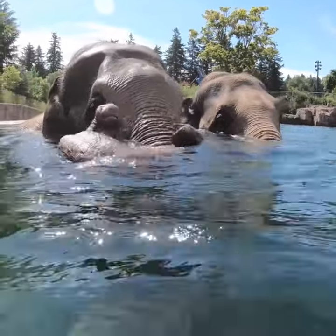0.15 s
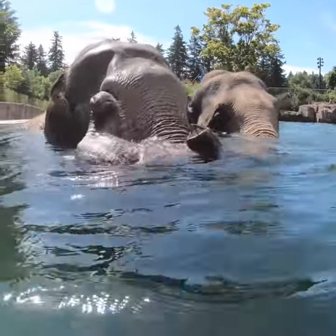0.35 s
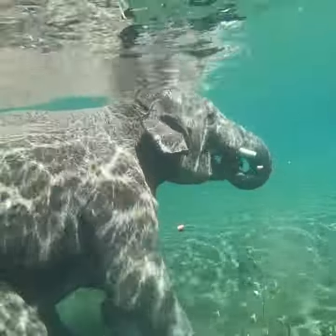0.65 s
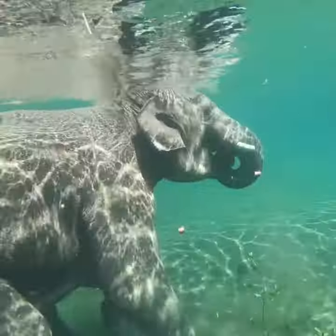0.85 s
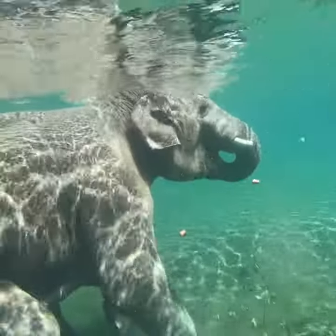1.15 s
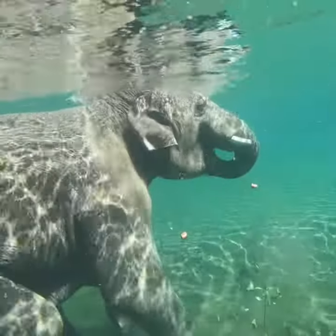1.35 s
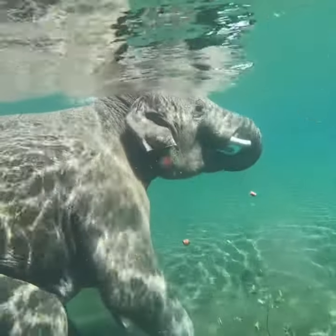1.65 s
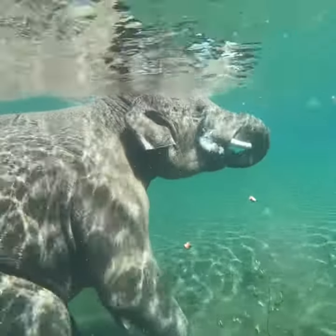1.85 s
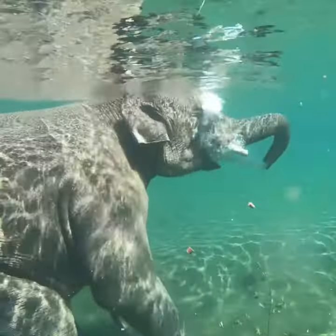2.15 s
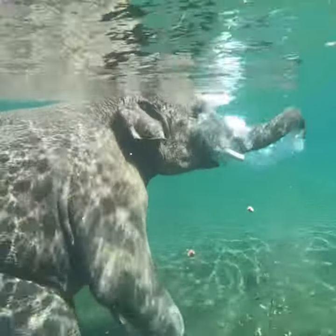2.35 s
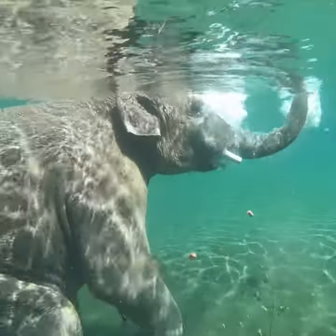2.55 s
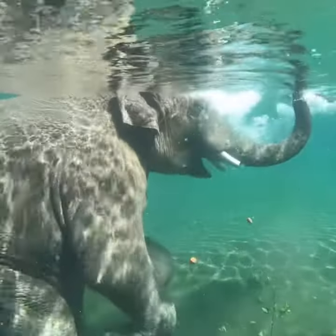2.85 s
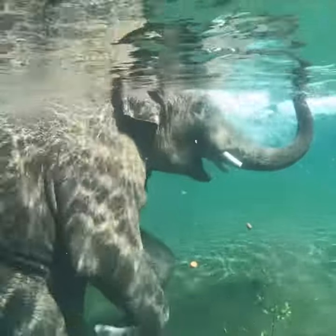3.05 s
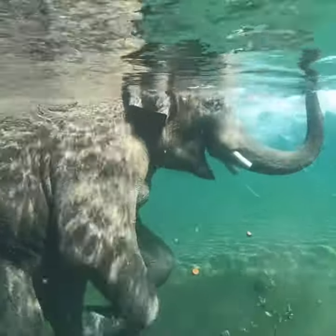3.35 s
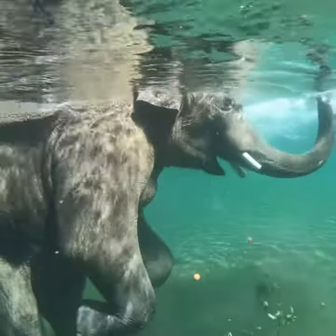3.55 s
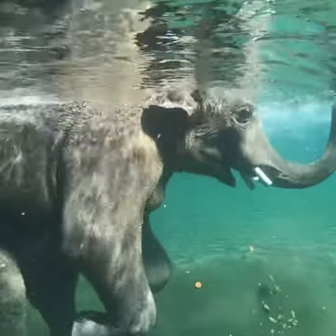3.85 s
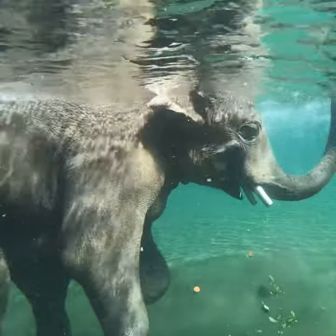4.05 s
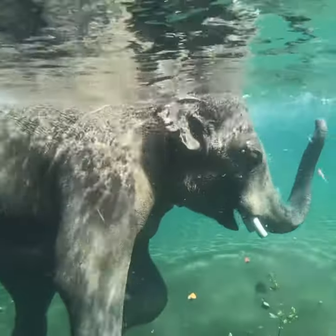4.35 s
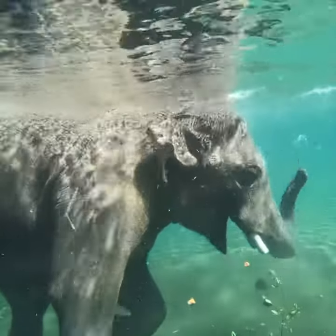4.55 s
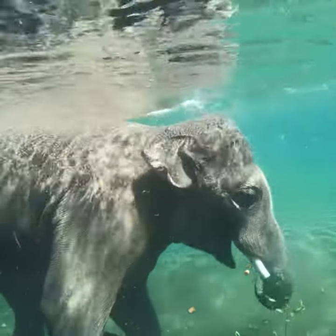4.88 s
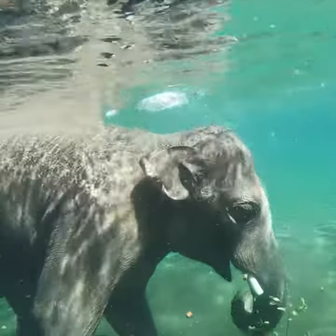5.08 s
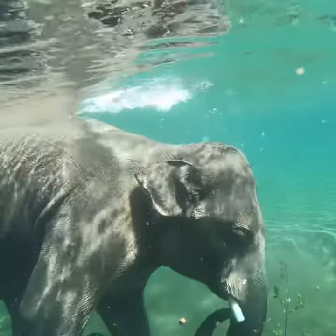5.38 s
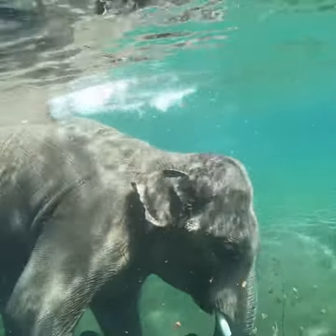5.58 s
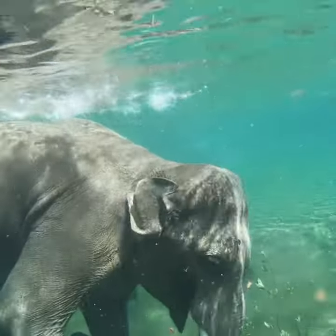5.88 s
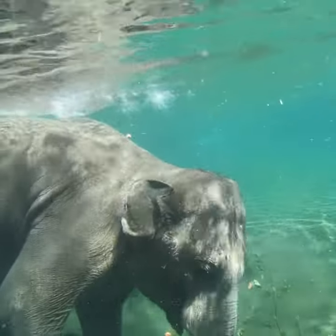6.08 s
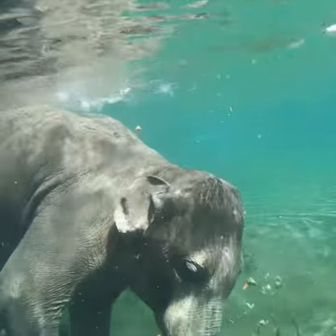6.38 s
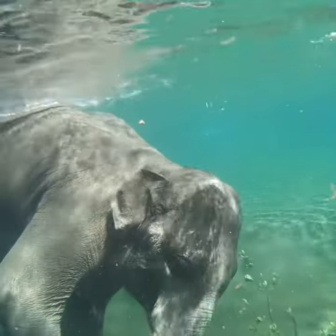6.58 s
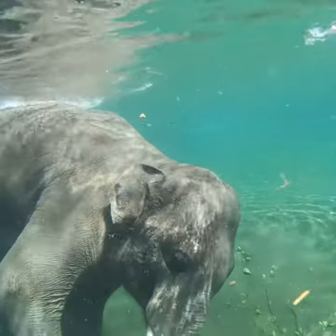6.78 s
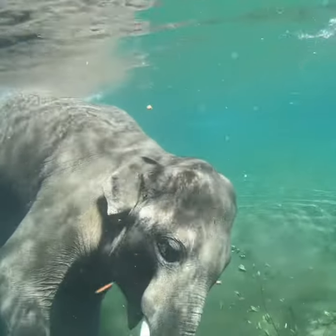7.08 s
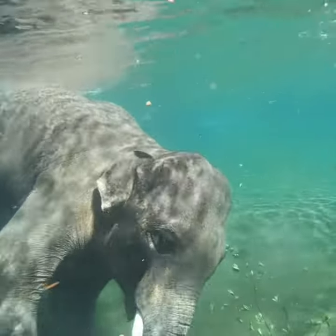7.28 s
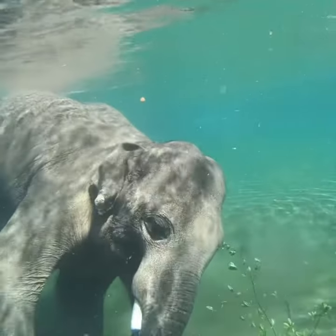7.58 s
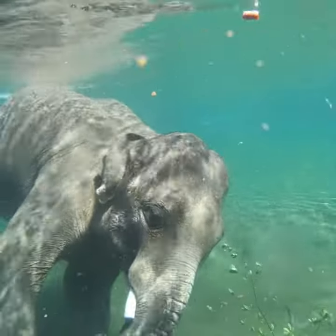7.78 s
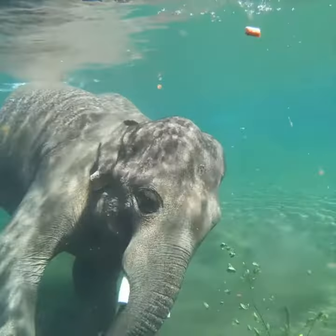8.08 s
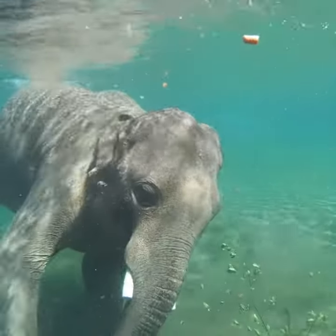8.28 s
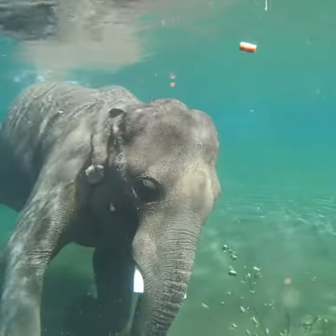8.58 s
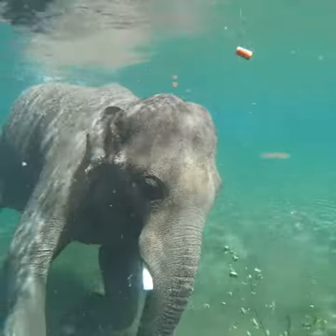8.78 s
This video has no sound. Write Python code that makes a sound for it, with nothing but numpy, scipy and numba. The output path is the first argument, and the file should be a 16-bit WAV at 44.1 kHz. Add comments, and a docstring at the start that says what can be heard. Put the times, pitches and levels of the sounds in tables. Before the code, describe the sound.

Close microphone in a small waterproof case: first a broad rush of water in air, then an abrupt plunge into dull, low underwater sound. Big bubbles glug, water heaves and pushes, and the case rings, ticks and scrapes. Air blown from a trunk fizzes early on; later surges come in clusters with calm gaps, peaking near seven seconds and ending sparse.

```python
"""Falling water above a pool, then elephants swimming below

A small sealed housing floats at the surface of an outdoor pool, where falling water rushes as shaped noise.
A hard cut with a click then goes under water beside swimming elephants: moving water heaves as low noise,
bubbles gurgle as damped resonances, and a burst of froth and a low throb follow air blown from a trunk.
Surges, knocks, streaming and rubbing ring the housing; its submerged port muffles the treble."""
import sys
import numpy as np
from scipy import signal
from scipy.fft import rfft, irfft, next_fast_len
from scipy.io import wavfile
from scipy.ndimage import uniform_filter1d
from numba import njit

SR = 44100
rng = np.random.default_rng(int(sys.argv[2]) if len(sys.argv) > 2 else 0)


def wrap_up_sound(samples):
    """Save the sound to the file named by the first command line argument, as 16-bit audio."""
    columns = np.atleast_2d(samples).T
    # keep every value between -1 and 1, then stretch to whole-number steps
    tamed = np.clip(columns, -1, 1)
    steps = np.round(tamed * 32767).astype(np.int16)
    wavfile.write(sys.argv[1], SR, steps)


N = 393813   # length [samples]
DIVE_S = .473   # time of the cut to under water [s]

# Housing resonances from low to high, struck by streaming, rubbing and ticks:
# (centre [Hz], width before the widening in resonate [Hz], gain [dB])
FIZZ_MODES = [(780, 68, 12), (920, 100, -1.5), (1068, 150, 3.5), (1250, 380, -17.5)]
WASH_MODES = [(1641, 100, 1), (1800, 89, 1.5), (2070, 220, -11)]
RUB_MODES = [(2241, 210, -0.5), (2603, 160, 1.5), (2798, 150, -2.5), (3300, 720, -20.5), (4010, 370, -17.5),
             (4574, 370, -28.5), (5400, 450, -29)]


def from_db(db):
    """Amplitude ratio: 20 dB is a factor of ten."""
    return 10 ** (np.asarray(db) / 20)


def rms_one(x):
    """Normalization to unit root-mean-square amplitude."""
    return x / np.sqrt(np.mean(x ** 2) + 1e-20)


def in_time(rows):
    """Linear interpolation of each column of a curve table, sample by sample."""
    s, *columns = np.transpose(rows)
    return [np.interp(np.arange(N) / SR, s, c) for c in columns]


def drift(rate_hz):
    """Slow random modulation of spread 1: noise through two equal real poles, computed every 40 samples."""
    r = np.exp(-80 * np.pi * rate_hz / SR)
    noise = rng.standard_normal(N // 40 + 2002)
    slow = signal.lfilter([1], [1, -2 * r, r * r], noise)[2000:]   # the start-up is dropped
    return np.interp(np.arange(N) / 40, np.arange(len(slow)), rms_one(slow))


def coloured(spectrum):
    """Stationary noise of unit rms, shaped by a spectral density and silent below its first frequency."""
    size = next_fast_len(N)
    hz, db = np.transpose(spectrum)
    f = np.arange(1, size // 2 + 2) * SR / size
    gain = from_db(np.interp(np.log(f), np.log(hz), db)) * (f > hz[0])
    return rms_one(irfft(rfft(rng.standard_normal(size)) * gain, size)[:N])


def resonate(x, modes):
    """Parallel resonances, each applied twice so that the response falls steeply between the peaks."""
    out = 0
    for k, (hz, width_hz, db) in enumerate(modes):
        r = np.exp(-np.pi * width_hz * 1.55 / SR)   # widened, since two passes narrow the peak
        b = [(1 - r * r) / 2, 0, (r * r - 1) / 2]
        a = [1, -2 * r * np.cos(2 * np.pi * hz / SR), r * r]
        once = signal.lfilter(b, a, x + 1e-18)
        out = out + (-1) ** k * from_db(db) * signal.lfilter(b, a, once)   # alternating signs
    return out


def grains(per_s, spread_db, smooth):
    """Impulsive excitation: random clicks of uneven size over a share of Gaussian noise."""
    sizes = from_db(spread_db * np.minimum(rng.exponential(1, N), 5)) * rng.choice([-1, 1], N)
    return rms_one(sizes * (rng.random(N) < per_s / SR)) + smooth * rng.standard_normal(N)


def pings(s, db, hz, t60, rise_s, glide):
    """Damped free oscillations that swell briefly, rise in pitch and last at most a quarter of a second."""
    out, t = np.zeros(N + SR), np.arange(SR // 4) / SR
    for at, level_db, f, ring in np.transpose(np.broadcast_arrays(s, db, hz, t60)):
        shape = (1 - np.exp(-t / rise_s)) * from_db(-60 * t / max(ring, .01))
        tone = np.sin(2 * np.pi * f * (t + glide * t * t / ring))
        start = int(at * SR)
        out[start:start + len(t)] += from_db(level_db) * shape / shape.max() * tone
    return out[:N]


@njit
def moving_ring(x, cos_w, r):
    """Two-pole resonance whose centre frequency follows a curve."""
    y = np.zeros(len(x))
    for i in range(2, len(x)):
        y[i] = x[i] - x[i - 2] + 2 * r * cos_w[i] * y[i - 1] - r * r * y[i - 2]
    return y


def gliding(x, hz, width_hz):
    """Moving resonance applied twice; the width is that of a single pass."""
    cos_w, r = np.cos(2 * np.pi * hz / SR), np.exp(-np.pi * width_hz / SR)
    return moving_ring(moving_ring(x, cos_w, r), cos_w, r)


def evened(x, window_s):
    """Division by the running rms: slow level changes go, the grain within the window stays."""
    power = uniform_filter1d(x ** 2, int(window_s * SR)).clip(0)
    return x / np.sqrt(power + 0.0013 * np.mean(x ** 2))


def driven(source, modes):
    """Forced resonance of the shell at a steady level."""
    return evened(resonate(source, modes), window_s=0.072)


def bursts(rows, opens_db, closes_db, edge_s):
    """Addition of powers: each row jumps in, climbs to its crest, sinks and stops; weights come later."""
    t = np.arange(N // 20 + 2) * 20 / SR   # computed every 20 samples
    shapes = []
    for s, rise, fall, *_ in rows:
        level_db = np.interp(t, [s - rise, s, s + fall], [opens_db, 0, closes_db])
        shapes.append(from_db(level_db) * (t >= s - rise) * (t < s + fall))
    edge = max(round(edge_s * SR / 20), 1)
    powers = uniform_filter1d(np.array(shapes), edge, axis=1).clip(0) ** 2
    return lambda weights: np.interp(np.arange(N) / 20, np.arange(len(t)), weights @ powers)


def hiss():
    """Electronic noise: a faint stationary random signal."""
    # noise spectrum: (frequency [Hz], relative density [dB per Hz])
    hiss_colour = [(3000, -7.5), (5500, -10), (8500, 1.5), (10500, -4), (12000, 5.5), (15500, -9.5)]
    return from_db(-95) * coloured(hiss_colour)


def rush():
    """Broadband noise of falling water in air, its roar and spray levelled apart; a click ends it."""
    # level curves: (time [s], roar level [dB], spray level [dB])
    rush_levels = [(0.0, -49.5, -68), (0.046, -41, -65), (0.062, -45.5, -65.5), (0.176, -43, -62.5),
                   (0.248, -43, -62), (0.326, -42, -58), (0.47, -41, -58)]
    # noise spectrum: (frequency [Hz], relative density [dB per Hz])
    rush_colour = [(30, -7), (100, -7.5), (160, 0), (600, -1.5), (1800, -12), (2300, -20), (3400, -26.5),
                   (4000, -26), (4700, -33), (5100, -39), (9000, -42.5), (10500, -51), (15500, -51)]
    click = np.zeros(N)
    click[round(DIVE_S * SR)] = from_db(-38)
    fall = coloured(rush_colour)
    roar_db, spray_db = in_time(rush_levels)
    roar = signal.sosfiltfilt(signal.butter(2, 2500, fs=SR, output="sos"), fall)
    both = from_db(roar_db) * rms_one(roar) + from_db(spray_db) * rms_one(fall - roar)
    return from_db(drift(17)) * both * (np.arange(N) < DIVE_S * SR) + click


def water():
    """Power summation of an uneven bed and surges, giving the levels and pitches of the low layers."""
    # bed between surges, before random lumps and layer trims: (time [s], swell level [dB],
    # push level [dB], gurgle level [dB], cavity level [dB], cavity pitch before squeeze and wander [Hz])
    bed_curve = [(.47, -56, -62, -59, -59, 505), (.52, -56, -71, -61, -57, 497),
                 (.75, -53.5, -69, -53.5, -60, 520), (1.05, -51, -59, -45, -45.5, 538),
                 (1.45, -53, -56, -48, -51, 486), (1.62, -47, -50.5, -39, -43, 544),
                 (1.85, -33, -33.5, -34.5, -47.5, 506), (2.15, -36, -41.5, -36, -39, 471),
                 (2.45, -43, -38.5, -45.5, -37.5, 460), (2.62, -37.5, -37.5, -34, -44.5, 492),
                 (3.1, -44, -54.5, -47.5, -52, 461), (3.55, -49, -45.5, -42.5, -37, 446),
                 (3.88, -54, -54, -59, -66, 484), (4.05, -49, -43, -45.5, -48, 456),
                 (4.3, -37.5, -35.5, -41.5, -47, 488), (4.6, -55.5, -51.5, -50, -52, 466),
                 (5.1, -58, -53, -49.5, -53.5, 460), (5.5, -48.5, -54, -40, -44, 486),
                 (5.8, -53.5, -48, -49.5, -57, 472), (6.25, -39, -57, -44, -46.5, 464),
                 (6.6, -34, -40, -44, -55.5, 502), (7.0, -35.5, -48, -26.5, -37, 493),
                 (7.35, -42, -50, -50.5, -63.5, 521), (7.75, -49, -58.5, -54.5, -54, 465),
                 (7.97, -59, -75, -63.5, -55, 505), (8.22, -57, -67, -54, -62, 475),
                 (8.5, -60.5, -65, -54, -60.5, 452), (8.93, -43, -68, -58.5, -52, 455)]
    # surges against the housing, levels before layer trims: (crest time [s], rise [s], fall [s],
    # push level [dB], gurgle level [dB], cavity level [dB], gurgle pitch before wander [Hz])
    surge_rows = [(.59, 0.048, .04, -44.5, -37.5, -40, 190), (1.53, .03, 0.03, -52, -31.5, -47, 187),
                  (1.67, .03, 0.071, -41, -25, -43, 195.7), (1.77, 0.064, 0.058, -27.5, -25.5, -38.5, 163),
                  (1.999, 0.018, 0.035, -38.5, -39.5, -31.5, 244),
                  (2.12, 0.018, 0.064, -33.5, -31, -48, 203), (2.25, .08, 0.053, -42, -32.5, -35.5, 179.4),
                  (2.38, 0.15, 0.017, -36, -29, -52, 167.7), (2.489, 0.022, 0.024, -26, -37, -33, 144),
                  (2.569, .05, 0.042, -38, -25.5, -26, 186), (2.78, .07, 0.041, -39, -34.5, -59.5, 156.4),
                  (2.92, .03, 0.033, -54, -40, -40, 194.7), (3.04, 0.077, 0.035, -49, -35.5, -52, 194),
                  (3.18, .03, 0.033, -61, -40, -45, 177), (3.34, .05, .05, -50, -28.5, -50, 186.7),
                  (3.41, 0.062, .05, -43, -27.5, -35.5, 256), (3.529, .05, .09, -31.5, -21, -38, 230),
                  (3.96, .02, 0.06, -42, -46, -60, 256), (4.1, 0.027, .025, -41.5, -47, -33.5, 170),
                  (4.18, .04, .04, -33, -18.5, -30, 242.6), (4.239, 0.078, 0.063, -25.5, -18, -24.5, 230),
                  (4.36, .03, .05, -37, -30, -33.5, 217.4), (4.45, .06, 0.045, -26.5, -18.5, -34, 259.4),
                  (4.71, 0.037, .04, -57, -34.5, -41, 237), (4.9, 0.034, 0.085, -41, -44.5, -53.5, 141),
                  (5.11, 0.022, 0.046, -47, -38, -38.5, 208), (5.27, 0.024, 0.05, -48, -35.5, -45, 174),
                  (5.37, 0.037, .05, -57, -40.5, -38, 185.3), (5.599, 0.034, 0.024, -43, -24, -31, 202),
                  (5.65, 0.026, 0.067, -37, -19.5, -29.5, 253.6),
                  (5.72, 0.049, 0.036, -30.5, -23.5, -39.5, 222), (6.0, 0.098, 0.11, -39.5, -32, -36, 209),
                  (6.15, 0.018, 0.044, -59, -41, -51, 260), (6.37, 0.028, 0.15, -46, -25, -35.5, 204),
                  (6.54, .08, 0.044, -28.5, -25, -38.5, 239), (6.772, 0.041, 0.086, -24, -17, -22.5, 213),
                  (6.87, 0.085, 0.046, -50.5, -14, -26.5, 200.7), (6.94, .04, .06, -44, -14, -21.5, 200),
                  (7.04, 0.046, 0.053, -33, -16.5, -17, 175), (7.1, 0.054, 0.094, -40, -17.5, -32.5, 204),
                  (7.19, 0.038, 0.088, -33.5, -31, -30.5, 193), (7.275, 0.036, .05, -40.5, -27, -47.5, 183),
                  (7.4, 0.027, 0.062, -45, -50.5, -45.5, 158.5),
                  (7.621, .055, 0.075, -40, -24, -41.5, 196.7),
                  (7.699, 0.067, 0.079, -32.5, -21, -34, 203.6), (7.85, 0.062, .08, -50, -45, -51, 183),
                  (8.281, 0.028, 0.18, -45.5, -36.5, -40.5, 189),
                  (8.385, 0.07, 0.099, -31.5, -31, -42.5, 172)]
    rest_gurgle_hz = 170       # gurgle pitch between surges, before wander
    squeeze_hz_per_db = 1.53   # a surge lifts the cavity pitch

    swell_db, *beds, cavity_hz = in_time(bed_curve)
    *surge_db, surge_hz = np.transpose(surge_rows)[3:]
    power = bursts(surge_rows, opens_db=-9, closes_db=-16, edge_s=0.038)
    calm = [from_db(2 * (db + 2.5 * drift(6.0))) for db in beds]   # powers, with lumps in dB
    total = [bed + power(from_db(2 * db)) for bed, db in zip(calm, surge_db)]
    push_db, gurgle_db, cavity_db = 10 * np.log10(total)
    # the gurgle pitch is an average weighted by power
    surge_pitch = power(from_db(2 * surge_db[1]) * surge_hz)
    gurgle_hz = (calm[1] * rest_gurgle_hz + surge_pitch) / total[1]
    cavity_hz = cavity_hz + squeeze_hz_per_db * 10 * np.log10(total[2] / calm[2])
    return (swell_db + 4 * drift(1.7), push_db, gurgle_db, gurgle_hz * (1 + .08 * drift(8.0)),
            cavity_db, cavity_hz * (1 + .03 * drift(13.0)))


def heave(swell_db, push_db):
    """Pressure fluctuation of moving water: low band noise as a slow swell and quicker pushes."""
    swell_band = signal.butter(2, [16, 45], "band", fs=SR, output="sos")
    push_band = signal.butter(2, [45, 100], "band", fs=SR, output="sos")
    swell = evened(signal.sosfilt(swell_band, rng.standard_normal(N)), window_s=0.08)
    push = evened(signal.sosfilt(push_band, rng.standard_normal(N)), window_s=0.026)
    return from_db(swell_db) * swell + from_db(push_db) * push


def gurgle(db, centre_hz):
    """Volume resonance of big bubbles: random births ring, many near one moving pitch, plus single ones."""
    # large single bubbles: (time [s], peak level before a 6 dB cut [dB], initial pitch [Hz], 60 dB decay [s])
    glugs = [(0.576, -44, 173, 0.072), (1.519, -26.5, 185, 0.091), (1.569, -30.5, 153, 0.1),
             (1.655, -25, 159, 0.088), (1.734, -17.5, 136, 0.047), (1.891, -22.5, 148, 0.1),
             (1.938, -35, 116, 0.1), (1.995, -18, 290, 0.13), (2.084, -29, 92.5, 0.18),
             (2.116, -19.5, 207, 0.047), (2.163, -18, 154, 0.053), (2.216, -22, 180, 0.15),
             (2.407, -26, 179, 0.15), (2.48, -18.5, 119, 0.16), (2.542, -15.5, 96.9, 0.091),
             (2.567, -14, 194, 0.13), (2.639, -17.5, 112.7, 0.12), (2.724, -18, 118.5, 0.14),
             (2.775, -19, 114.4, 0.23), (3.017, -39, 370, 0.072), (3.018, -25.5, 197, 0.056),
             (3.154, -36.5, 152, 0.048), (3.266, -21, 210, 0.044), (3.325, -23.5, 178, 0.098),
             (3.522, -15, 94.5, 0.13), (3.525, -8.5, 247.8, 0.12), (3.954, -28, 283.4, 0.12),
             (4.074, -35, 151, 0.092), (4.18, -33.5, 225, 0.075), (4.183, -16, 346, 0.24),
             (4.414, -19, 252, 0.24), (4.64, -38, 243, 0.16), (4.815, -32.5, 247, 0.043),
             (4.957, -29.5, 94, 0.13), (5.031, -32.5, 224, 0.084), (5.12, -51, 91.5, 0.1),
             (5.125, -25, 194, 0.058), (5.249, -25, 177, 0.11), (5.597, -14.5, 181, 0.055),
             (5.641, -12.5, 256.4, 0.11), (5.906, -33, 172, 0.085), (5.954, -32, 244, 0.12),
             (6.285, -32, 112, 0.089), (6.355, -15.5, 143, 0.04), (6.458, -15, 245, 0.14),
             (6.52, -16.5, 250, 0.097), (6.731, -14.5, 306.6, 0.21), (6.974, -10, 222.6, 0.1),
             (7.141, -10, 227.7, 0.2), (7.262, -15, 140.5, 0.084), (7.382, -31, 150, 0.083),
             (7.491, -29.5, 166, 0.13), (7.571, -16, 157.6, 0.072), (7.624, -14, 230.7, 0.17),
             (7.681, -15.5, 182.3, 0.4), (8.26, -29.5, 178.4, 0.14), (8.37, -30, 283, 0.066),
             (8.376, -11.5, 171, 0.11)]
    born, dealt, spread = grains(260, 2.33, 0.018), rng.integers(0, 14, N), 0
    for k, hz in enumerate(np.geomspace(95, 400, 14)):   # each birth falls in one of 14 sizes
        tilt_db = -5.0 * np.log2(hz / 190) ** 2
        spread = spread + resonate(born * (dealt == k), [(hz, hz / 7.2, tilt_db)])
    crowd = evened(gliding(grains(140, 4.5, 0.093), centre_hz, width_hz=83.4), window_s=0.035)
    both = evened(evened(spread, window_s=0.05) + crowd, window_s=0.069)
    s, peak_db, hz, t60 = np.transpose(glugs)
    single = pings(s, peak_db - 6, hz, t60, rise_s=0.0067, glide=0.027)
    return from_db(db - 3.0 + drift(33)) * both + single


def cavity(db, hz):
    """Cavity resonance: the air space of the housing rings at a pitch that shifts with the squeeze on it."""
    # knocks that ring the cavity: (time [s], peak level before a 3.5 dB cut [dB], initial pitch [Hz])
    knocks = [(0.56, -37, 560), (0.771, -32.5, 478), (0.996, -40, 506), (1.137, -32.5, 573),
              (1.516, -21, 636), (1.65, -18.5, 586), (1.676, -24, 580), (1.724, -22.5, 520),
              (1.743, -23, 567), (1.868, -30.5, 457), (2.101, -30.5, 570), (2.123, -33, 410),
              (2.162, -26.5, 447), (2.236, -34, 487), (2.375, -40, 523), (2.511, -21.5, 475),
              (2.555, -21.5, 523), (2.569, -18.5, 385), (2.669, -32.5, 403), (2.99, -32.5, 440),
              (3.016, -33, 440), (3.357, -28.5, 468), (3.486, -34.5, 470), (3.516, -26, 395),
              (4.144, -25.5, 504), (4.171, -25, 405), (4.204, -27.5, 395), (4.234, -23.5, 555),
              (4.341, -31, 517), (4.431, -21.5, 530), (4.564, -34.5, 427), (5.078, -35.5, 458),
              (5.266, -32.5, 481), (5.578, -29.5, 510), (5.601, -16, 427), (5.65, -28.5, 406),
              (5.701, -24, 397), (5.955, -39, 465), (5.989, -28, 448), (6.043, -27.5, 480),
              (6.078, -28.5, 465), (6.154, -29.5, 463), (6.222, -34.5, 476), (6.384, -40, 506),
              (6.399, -18.5, 514), (6.459, -22, 462), (6.515, -32, 424), (6.534, -21.5, 469),
              (6.725, -33, 460), (6.748, -32, 473), (6.781, -14, 456), (6.793, -9.5, 494),
              (6.831, -15, 556), (6.858, -10.5, 538), (6.895, -13, 533), (6.926, -23, 554),
              (6.968, -10.5, 514), (6.994, -13.5, 560), (7.026, -27, 550), (7.126, -14.5, 544),
              (7.187, -35, 508), (7.261, -20.5, 533), (7.572, -26.5, 550), (7.594, -21.5, 517),
              (7.619, -26.5, 573), (7.678, -14, 458), (7.766, -42, 506), (8.264, -30.5, 448),
              (8.358, -27, 462), (8.378, -21, 420)]
    ring = evened(gliding(grains(500, 3.0, 0.41), hz, width_hz=108.0), window_s=.06)
    s, peak_db, knock_hz = np.transpose(knocks)
    knocked = pings(s, peak_db - 3.5, knock_hz, t60=0.042, rise_s=0.004, glide=0.042)
    return from_db(db - 2.0 + 2.8 * drift(20)) * ring + knocked


def stream(fizz_db, wash_db, sparkle_db, glint_db):
    """Flow excitation: one irregular source of streaming water drives four groups of shell resonances."""
    # higher groups: (centre [Hz], width before the widening in resonate [Hz], gain [dB])
    sparkle_modes = [(2700, 190, 3.5), (3100, 200, -5), (2300, 100, -7)]
    glint_modes = [(3740, 190, 2.5), (3360, 180, -2.5), (4220, 230, -5)]
    flow, swirl_db, out = grains(300, 2.5, 1.3), 1.5 * drift(14), 0
    for db, modes in ((fizz_db, FIZZ_MODES), (wash_db, WASH_MODES),
                      (sparkle_db, sparkle_modes), (glint_db, glint_modes)):
        out = out + from_db(db + swirl_db + 2 * drift(20)) * driven(flow, modes)
    return out


def bubbles(fizz_db):
    """Bubble resonance: pitched ones, random small ones that follow the fizz, and a cloud of fine ones."""
    # cloud passing close: (time [s], level [dB], centre [Hz])
    cloud_curve = [(4.84, -100, 3200), (4.87, -69, 3300), (4.92, -70.5, 3300), (4.95, -85, 2980),
                   (5.0, -69.5, 2870), (5.07, -65, 2900), (5.1, -75, 3750), (5.12, -100, 3800)]
    # single small bubbles: (time [s], peak level [dB], initial pitch [Hz], 60 dB decay [s])
    blips = [(0.659, -63, 1180, 0.074), (1.517, -45, 1250, 0.022), (1.547, -37, 1430, 0.016),
             (1.572, -63, 3300, 0.014), (1.595, -61, 3100, 0.017), (1.61, -69, 3070, .02),
             (1.63, -26.5, 840, 0.015), (1.644, -25, 940, 0.025), (2.899, -45.5, 1635, 0.024),
             (5.405, -55, 1380, 0.029), (6.69, -49.5, 1640, 0.026), (7.43, -80, 2120, .02),
             (7.462, -79, 2700, 0.37), (8.019, -64, 1630, 0.073), (8.033, -66, 1190, 0.05),
             (8.036, -62, 940, 0.075), (8.08, -72, 1010, 0.05), (8.114, -65, 1800, 0.034),
             (8.12, -73, 2700, .03), (8.61, -62, 940, 0.079)]
    db, hz = in_time(cloud_curve)
    cloud = evened(gliding(grains(800, 3.0, 1.5), hz, width_hz=800), window_s=.05)
    when, size, strength = rng.random((160, 3)).T
    s = DIVE_S + when * (N / SR - DIVE_S)
    small_hz = 650 * 1.9 ** size
    small_db = fizz_db[(s * SR).astype(int)] + 1.5 + 5.1 * strength
    small = pings(s, small_db, small_hz, 35.0 / small_hz, rise_s=.003, glide=.06)
    single = pings(*np.transpose(blips), rise_s=0.0026, glide=0.018)
    return from_db(db) * cloud * (db > -94) + small + single


def strokes():
    """Intermittent contact: gains of bright, middle and dull rubbing, with edges of a few milliseconds."""
    # rubbing strokes on the housing: (hardest time [s], rise [s], fall [s],
    # bright level [dB], middle level [dB], dull level [dB])
    stroke_rows = [(0.582, 0.029, .03, -66, -58, -48.5), (1.66, .02, .04, -55, -50, -47),
                   (1.74, 0.035, .08, -55.5, -48, -49), (1.89, .03, .06, -63.5, -62, -61),
                   (2.52, 0.016, .03, -58, -54, -51), (2.57, 0.031, .028, -47.5, -43, -37.5),
                   (2.67, .011, .024, -57.5, -62, -52.5), (2.738, 0.014, .012, -67, -75.5, -59),
                   (2.773, 0.01, .017, -64, -70.5, -53), (2.905, 0.021, .02, -61.5, -63, -59),
                   (2.99, 0.011, .04, -62, -70, -51.5), (3.177, 0.023, .017, -62, -57, -52.5),
                   (3.268, 0.016, .032, -65.5, -65, -60), (3.33, 0.0089, .04, -58, -61, -49),
                   (3.406, 0.067, .054, -61, -48.5, -39), (3.515, 0.038, .049, -49.5, -47.5, -39.5),
                   (4.08, .01, .015, -67, -72, -66.5), (4.15, 0.024, .05, -48.5, -50, -43.5),
                   (4.195, 0.041, .04, -47.5, -49, -43), (4.249, 0.11, .045, -47, -47, -41.5),
                   (4.352, 0.043, .06, -57, -56.5, -53.5), (4.444, 0.047, .035, -46, -42.5, -41.5),
                   (4.566, 0.0052, .02, -65, -63, -59), (4.644, 0.022, .021, -65, -57, -55),
                   (4.717, .03, .017, -77, -56, -52), (5.601, 0.027, .022, -50.5, -52, -41.5),
                   (5.66, 0.033, .03, -50, -52, -41.5), (5.699, 0.028, .038, -51, -50, -41),
                   (6.031, 0.077, .03, -60.5, -58, -48), (6.159, 0.016, .021, -76, -57, -57),
                   (6.361, .012, .07, -55, -56.5, -48), (6.468, 0.021, .032, -55.5, -67, -46),
                   (6.532, 0.025, .026, -44, -48, -39.5), (6.623, .012, .014, -61, -65, -56),
                   (6.744, 0.031, .034, -44.5, -50.5, -40), (6.793, 0.017, .022, -48, -48.5, -33),
                   (6.84, .012, .016, -55, -56.5, -42), (6.869, .012, .05, -54, -53, -46),
                   (6.935, 0.1, .022, -52.5, -49.5, -47), (6.982, 0.021, .035, -48.5, -49, -40),
                   (7.035, 0.019, .03, -50, -50, -43), (7.085, 0.037, .03, -53, -52, -58),
                   (7.14, 0.02, .02, -53.5, -47.5, -50), (7.211, 0.049, .034, -55.5, -58.5, -47),
                   (7.265, 0.025, .015, -59.5, -55.5, -49.5), (7.601, 0.039, .05, -57.5, -56, -49),
                   (7.648, 0.038, .03, -54.5, -53, -52.5), (7.685, 0.028, .02, -50.5, -48, -42.5),
                   (7.73, 0.044, .012, -67, -65, -72), (7.817, 0.017, .015, -68, -65.5, -63),
                   (7.893, 0.018, .012, -73, -68, -64.5), (8.27, 0.021, .04, -68, -59, -64),
                   (8.33, 0.035, .035, -64, -62, -63), (8.379, 0.04, .014, -64, -53, -57.5),
                   (8.447, .007, .013, -75, -72, -72)]
    power = bursts(stroke_rows, opens_db=-11.5, closes_db=-16, edge_s=.004)
    return np.sqrt([power(from_db(2 * db)) for db in np.transpose(stroke_rows)[3:]])


def rub():
    """Stick-slip friction: the same slips of one contact shake three groups of resonances at once."""
    bright, middle, dull = strokes() * from_db(2.0 * drift(53))   # slips come in clumps
    slips = grains(1200, 3.8, .8)
    low = dull * driven(slips, FIZZ_MODES) + middle * driven(slips, WASH_MODES)
    return low + bright * driven(slips, RUB_MODES)


def blow():
    """Bubble froth of air blown from a trunk: moving resonances whose upper edge sinks."""
    # burst curve: (time [s], level [dB], upper edge [Hz])
    blow_curve = [(1.497, -84, 1580), (1.51, -40, 1575), (1.53, -33.5, 1500), (1.56, -44.5, 1306),
                  (1.62, -44.5, 1276), (1.645, -44.5, 1250), (1.66, -61, 1100), (1.67, -95, 1000)]
    db, edge_hz = in_time(blow_curve)
    froth = grains(1500, 8.0, 0.68)
    crowd = 0
    for share in (.5, .7, .88):
        crowd = crowd + evened(gliding(froth, share * edge_hz, width_hz=130), window_s=0.035)
    return from_db(db) * (db > -74) * evened(crowd, window_s=0.026)


def ticks():
    """Impulse response of the shell: each tick strikes all three groups and drags a short noisy scuff."""
    # ticks: (time [s], strike level before the group offsets [dB], extra strike level of the rub group [dB])
    tick_rows = [(1.513, -45, -5), (1.524, -40, -9), (1.645, -33, 0), (1.6866, -27.5, -3),
                 (1.7214, -27.5, -4), (2.515, -43, 1), (2.5336, -26, 3), (2.5608, -22, -8.5),
                 (2.6696, -31.5, 1), (2.7717, -47.5, 7.5), (2.8983, -40, 2.5), (2.9903, -36.5, 0),
                 (3.3262, -35, 6), (3.3504, -47, -8), (3.383, -38, -7.5), (3.482, -36, 11), (3.507, -23, 1),
                 (4.1331, -51, -4), (4.145, -34.5, 6), (4.2426, -21.5, 1), (4.3396, -53, 0),
                 (4.402, -37, -1), (4.4234, -29, 7), (4.5636, -37.5, 8.5), (5.5768, -39, 11),
                 (5.5913, -29, 4), (5.6543, -42, 10), (5.698, -27, 10), (5.8283, -41.5, -17),
                 (5.8845, -41, -2), (5.984, -38, 5), (5.9974, -26, -4.5), (6.0283, -37, 8),
                 (6.148, -41, -2), (6.2201, -33.5, -13), (6.357, -41, 0.5), (6.463, -38, 4),
                 (6.5142, -37, 0), (6.53, -25, 0), (6.6918, -44, -8), (6.7217, -43, 3), (6.733, -30, 0),
                 (6.7879, -26, 7), (6.834, -34, 7), (6.86, -47, 19), (6.9252, -43, -4), (6.9661, -46.5, 2),
                 (6.9774, -35, 2), (7.0263, -30, 7), (7.0474, -32, 6), (7.0753, -39.5, 4.5),
                 (7.1285, -43.5, 4), (7.2131, -36, 8), (7.5738, -56, -8.5), (7.8013, -53, 2),
                 (8.2632, -35, 6), (8.3749, -34, 3), (8.7561, -43, 3), (8.788, -46.5, 1)]
    s, peak_db, bright_db = np.transpose(tick_rows)
    out = 0
    for modes, db in ((FIZZ_MODES, peak_db + 11.5), (WASH_MODES, peak_db + 21.5),
                      (RUB_MODES, peak_db + bright_db + 9.5)):
        clicks = np.zeros(N)
        clicks[(s * SR).astype(int)] = from_db(db)
        decay = signal.lfilter([1], [1, -np.exp(-1 / (0.0029 * SR))], clicks)   # 2.9 ms time constant
        scuff = decay * rng.standard_normal(N)
        out = out + resonate(clicks + 0.042 * scuff, modes)
    return out


def throb():
    """Falling low tone: a throb of uneven loudness sinks in pitch while the blown air rises in big pockets."""
    # tone curve: (time [s], pitch [Hz], rms level [dB])
    throb_curve = [(1.72, 50.6, -40), (1.744, 50, -37), (1.86, 50.7, -32), (1.874, 50, -55),
                   (1.924, 47.8, -26), (2.012, 47.9, -32.5), (2.054, 44.1, -29), (2.106, 40.2, -40),
                   (2.18, 38, -26.5), (2.24, 37, -45)]
    hz, db = in_time(throb_curve)
    start_s, end_s = throb_curve[0][0], throb_curve[-1][0]
    fade = np.interp(np.arange(N) / SR, [start_s - .02, start_s, end_s, end_s + .03], [0, 1, 1, 0])
    return np.sqrt(2) * from_db(db) * fade * np.sin(2 * np.pi * np.cumsum(hz) / SR)


def port(x):
    """Transmission loss of the submerged port: a dip above the cavity ring and muffled treble."""
    dip_hz, dip_width_hz, dip_share, cut_hz = 721, 124, 0.34, 6300   # width before the widening in resonate
    x = x - dip_share * resonate(x, [(dip_hz, dip_width_hz, 0)])
    return signal.sosfilt(signal.butter(4, cut_hz, fs=SR, output="sos"), x)


def scene():
    """Superposition: air before the cut, water after it, faint electronic hiss throughout."""
    # water streaming past the housing: (time [s], fizz level [dB], wash level [dB],
    # sparkle level [dB], glint level [dB]), before random swirl
    stream_curve = [(.47, -77, -73, -91, -83), (.6, -74, -82, -93, -89), (.8, -74, -74, -86.5, -95),
                    (1.1, -70.5, -79.5, -87.5, -94), (1.18, -70.5, -81, -88, -99),
                    (1.49, -63.5, -82, -93, -100), (1.58, -46, -73, -78, -94), (1.67, -52, -61, -66, -90.5),
                    (1.75, -71, -70, -71, -81), (1.92, -63, -61.5, -74.5, -81.5),
                    (2.3, -57, -66, -80.5, -90), (2.65, -65.5, -72, -75.5, -85), (3.05, -73, -80, -78, -90),
                    (3.4, -61.5, -69, -67.5, -72.5), (3.56, -56.5, -62, -74, -78),
                    (3.78, -71, -64.5, -71.5, -77), (3.85, -79, -78, -89, -89), (4.1, -61.5, -78, -83, -96),
                    (4.27, -59, -64.5, -71.5, -83), (4.55, -69, -79.5, -73, -82.5),
                    (4.88, -66.5, -66, -74, -86), (5.13, -67, -71, -81.5, -81),
                    (5.55, -55.5, -62.5, -83.5, -90.5), (5.75, -77, -72.5, -78, -88.5),
                    (5.95, -59.5, -68, -74.5, -78.5), (6.36, -62, -63.5, -73.5, -84.5),
                    (6.6, -70.5, -76, -77, -86), (6.92, -52.5, -58.5, -68.5, -78.5),
                    (7.1, -53, -66, -84, -83), (7.28, -83.5, -83.5, -98.5, -105),
                    (7.65, -76, -69, -81.5, -100), (7.8, -85, -86.5, -98.5, -100),
                    (8.08, -79, -81.5, -89, -102), (8.31, -85, -90, -96, -99), (8.5, -77, -77.5, -85, -92),
                    (8.93, -78.5, -78, -86, -93)]
    swell_db, push_db, gurgle_db, gurgle_hz, cavity_db, cavity_hz = water()
    body = heave(swell_db, push_db) + throb() + gurgle(gurgle_db, gurgle_hz) + cavity(cavity_db, cavity_hz)
    # the housing walls pass little of the low layers above 595 Hz
    body = signal.sosfilt(signal.butter(4, 595, fs=SR, output="sos"), body)
    stream_db = in_time(stream_curve)
    shell = stream(*stream_db) + rub() + ticks()
    below = port(body + shell + bubbles(stream_db[0]) + blow()) * (np.arange(N) >= DIVE_S * SR)
    return (rush() + below + hiss())[None]


def record(dry):
    """Band limitation: a steep low-pass removes the top above 15.7 kHz."""
    return signal.sosfilt(signal.cheby2(12, 60, 15700, fs=SR, output="sos"), dry)


dry = scene()
out = record(dry)
wrap_up_sound(out)
```